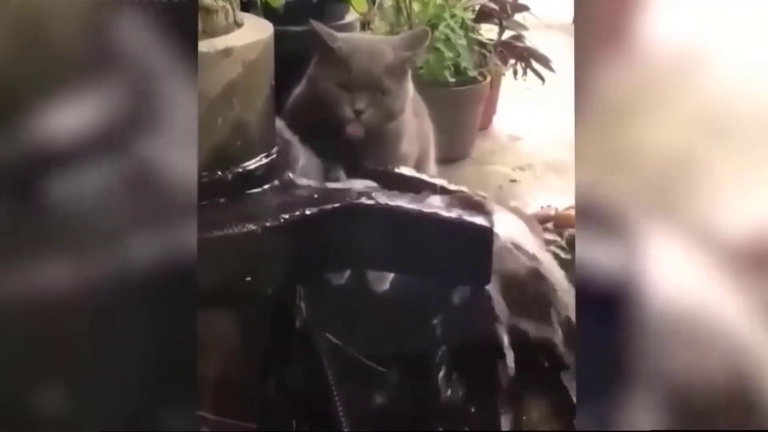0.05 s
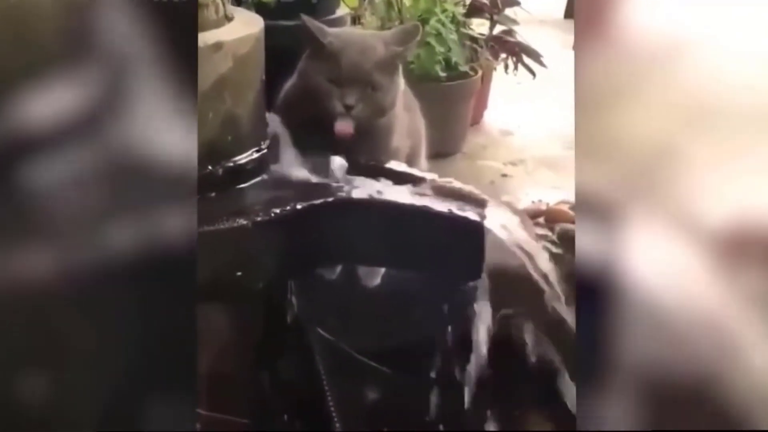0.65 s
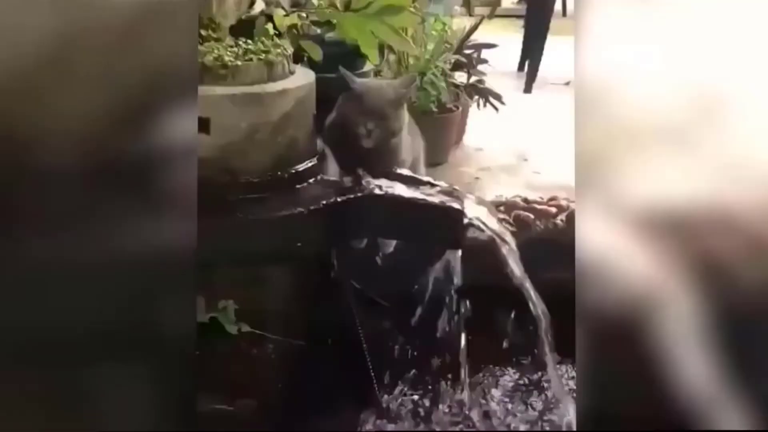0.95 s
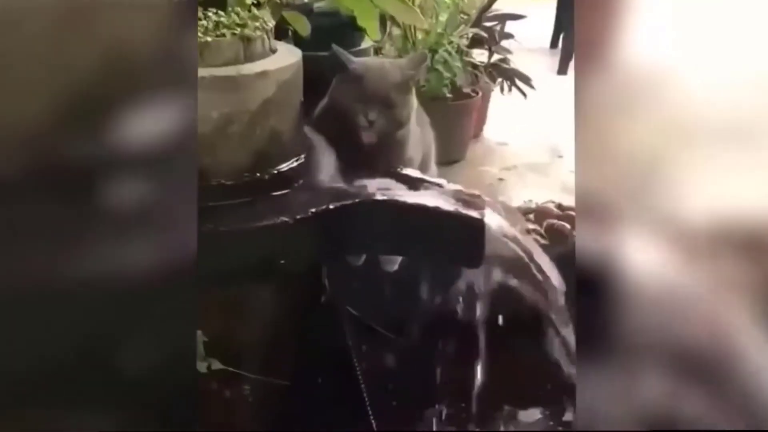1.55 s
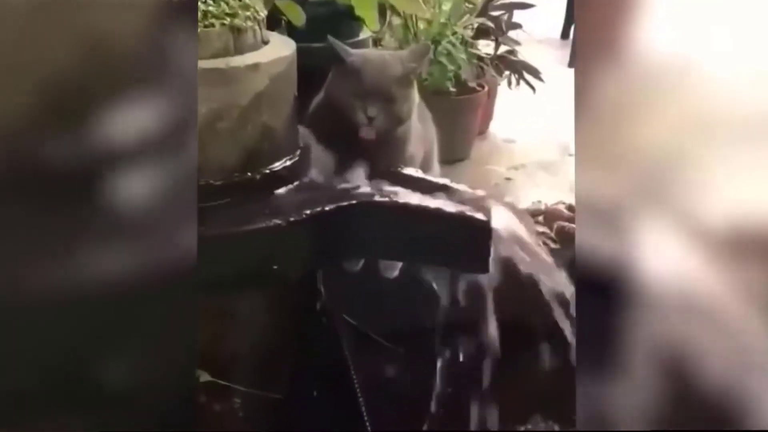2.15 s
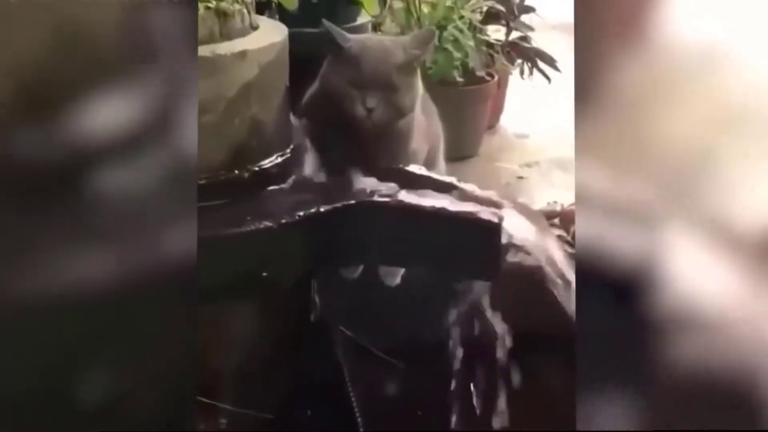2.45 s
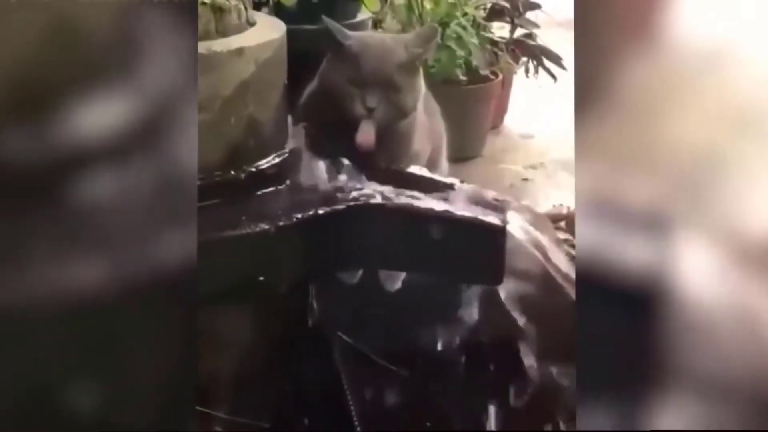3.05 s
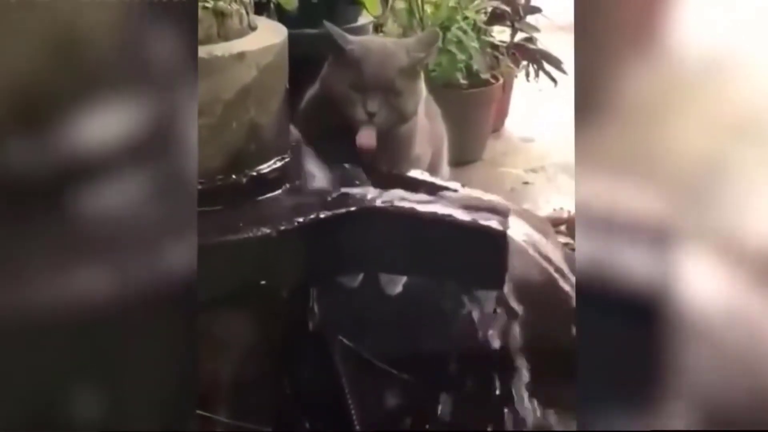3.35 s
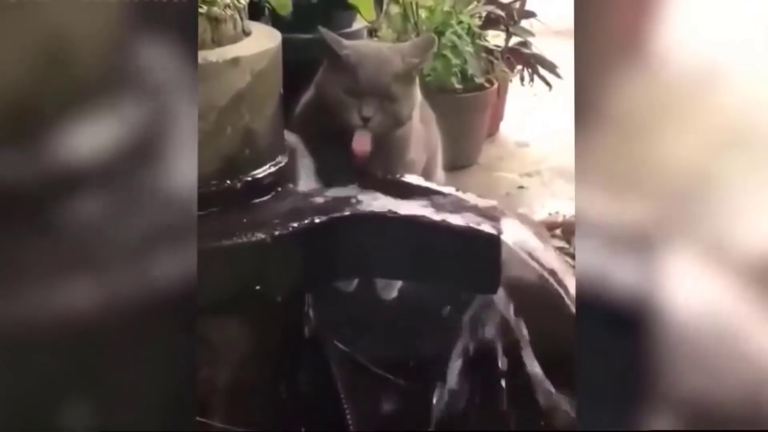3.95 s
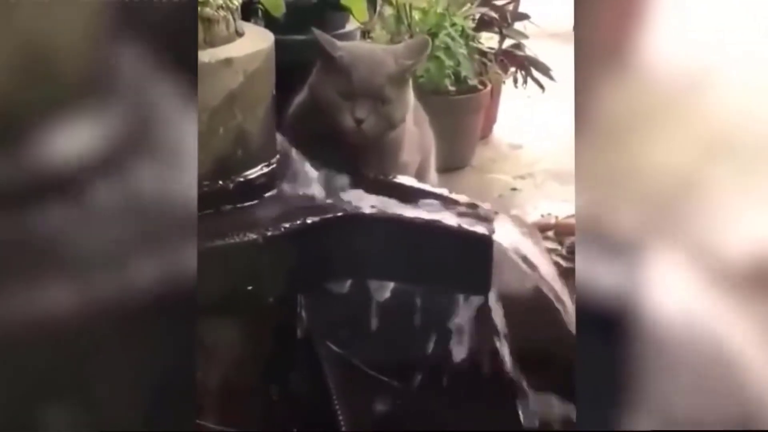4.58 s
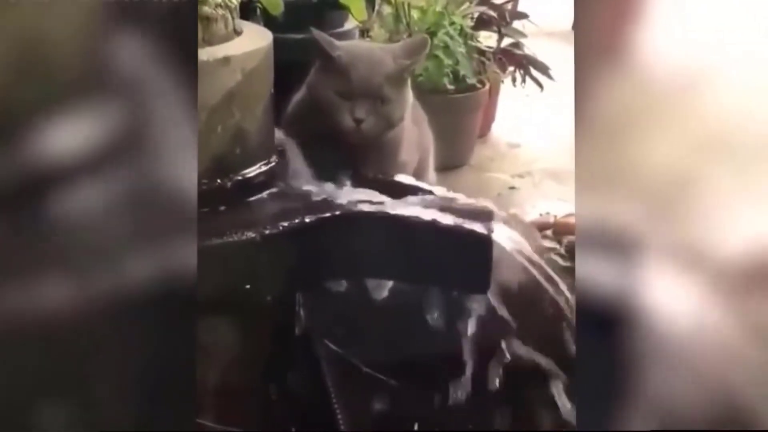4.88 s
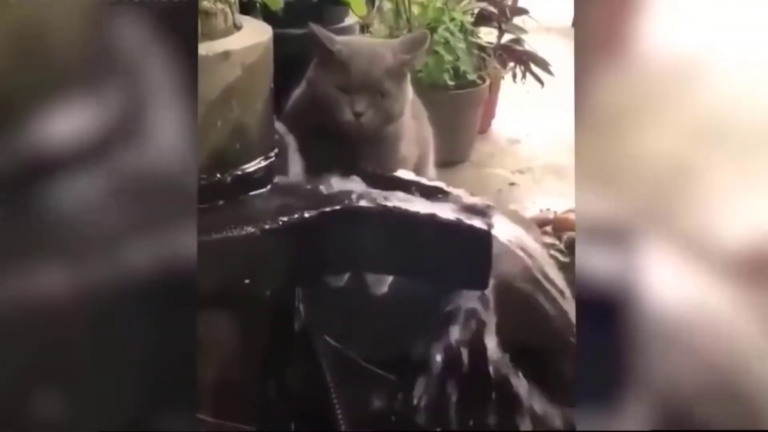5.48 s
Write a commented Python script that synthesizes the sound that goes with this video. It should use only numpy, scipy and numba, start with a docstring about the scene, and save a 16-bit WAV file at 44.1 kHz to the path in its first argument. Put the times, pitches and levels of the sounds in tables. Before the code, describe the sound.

Water pours from a small garden fountain, splashing and gurgling into its basin over a low, steady pump hum.

```python
"""Small garden fountain, close up.

Water spills over a lip and breaks up in the basin: droplets crackle, fine spray fizzes and lumps of
water slap the surface. Trapped bubbles ring and deep air pockets glug over a steady pump hum.
Just before the one-second mark the sound cuts out for a third of a second. One loud slap late on
carries a bright, clipping-like click."""
import sys
import numpy as np
from scipy import signal
from scipy.fft import rfft, irfft, next_fast_len
from scipy.io import wavfile
from scipy.ndimage import uniform_filter1d, map_coordinates
from numba import njit

SR = 44100
rng = np.random.default_rng(int(sys.argv[2]) if len(sys.argv) > 2 else 0)


def inscribe(sig):
    """Save sig as 16-bit PCM at rate SR to the path in sys.argv[1].

    A 1-D sig is mono; a 2-D sig holds one channel per row.
    Samples are clipped to [-1, 1] before scaling.
    """
    pcm = np.round(np.clip(np.atleast_2d(sig).T, -1, 1) * 32767)
    wavfile.write(sys.argv[1], SR, pcm.astype(np.int16))


N = 247842


def amp(db):
    """Decibels to gain."""
    return 10 ** (np.asarray(db) / 20)


def unit_rms(x):
    """Scale to rms 1."""
    return x / np.sqrt(np.mean(x ** 2) + 1e-20)


def unit_peak(x):
    """Scale to peak 1."""
    return x / np.abs(x).max()


def curves(rows):
    """One value per sample for each column after the time."""
    times_s, *columns = np.transpose(rows)
    return [np.interp(np.arange(N) / SR, times_s, column) for column in columns]


def wobble(rate_hz):
    """Smooth random curve, rate_hz knots a second."""
    knots = rng.standard_normal(int(N * rate_hz / SR) + 4)
    return map_coordinates(knots, [np.arange(N) * rate_hz / SR])


def swells(times_s, level_db, rise_s):
    """Envelope of stirred water: each event swells in rise_s and fades more slowly."""
    age = np.maximum(np.arange(N) / SR - times_s[:, None], 0) / rise_s
    return amp(level_db) @ (age * np.exp(1 - age))


def filtered(x, response):
    """Apply a complex response, a function of Hz."""
    size = next_fast_len(N + SR // 2)
    return irfft(rfft(x, size) * response(np.fft.rfftfreq(size, 1 / SR)), size)[..., :N]


def coloured(x, points):
    """Minimum-phase filter through (Hz, dB) points; attacks stay sharp."""
    size = 4096
    hz, db = np.transpose(points)
    gain = amp(np.interp(np.log(np.fft.rfftfreq(size, 1 / SR) + 1), np.log(hz), db))
    cepstrum = irfft(np.log(gain))
    cepstrum[1:size // 2] *= 2
    cepstrum[size // 2 + 1:] = 0
    impulse = irfft(np.exp(rfft(cepstrum)))
    return signal.fftconvolve(x, impulse)[:N]


def diffused(x, t60_s, wet_db):
    """Smear x through a drifting blend of eight short noise tails."""
    t = np.arange(SR // 6) / SR
    tails = rng.standard_normal((8, len(t))) * amp(-60 * t / t60_s) * (t > .002)
    blend = np.array([wobble(6) for _ in tails])
    sent = x * blend / np.linalg.norm(blend, axis=0)
    smeared = signal.fftconvolve(sent, tails / np.linalg.norm(tails[0]), axes=1)
    return amp(wet_db) * smeared.sum(axis=0)[:N]


@njit
def bubbles(times_s, hz, gain, t60_s, rise, samples):
    """Damped sines; each climbs in pitch by the fraction rise as the bubble nears the surface."""
    out = np.zeros(samples)
    for k in range(len(times_s)):
        start = int(times_s[k] * SR)
        for i in range(max(0, -start), min(int(t60_s[k] * SR), samples - start)):
            t = i / SR
            age = t / t60_s[k]
            attack = min(1.0, 2 * hz[k] * t)
            phase = 2 * np.pi * hz[k] * t * (1 + rise * age / 2)
            out[start + i] += gain[k] * attack * np.exp(-np.log(1000) * age) * np.sin(phase)
    return out


def shower(count, low_hz, high_hz, cycles, spread_db, rise):
    """Bubbles at random times: most faint, a few strong; big ones ring longest."""
    when, pitch, strength, life = rng.random((count, 4)).T
    hz = low_hz + (high_hz - low_hz) * pitch
    t60_s = cycles * (.5 + life) / hz
    rarity = np.minimum(-np.log(1 - strength), 4)
    gain = amp(spread_db * rarity) / np.sqrt(t60_s)
    return unit_rms(bubbles(when * N / SR, hz, gain, t60_s, rise, N))


def clumps(rate_hz, t60_s, spread_db):
    """Impact strength: water arrives in random lumps, each swelling quickly, then fading."""
    power = (rng.random(N) < rate_hz / SR) * amp(spread_db * rng.random(N)) ** 2
    fading = signal.lfilter([1], [1, -amp(-60 / (t60_s * SR)) ** 2], power)
    return unit_rms(np.sqrt(np.abs(uniform_filter1d(fading, size=160))))


# Pump hum: t/s, level/dB
HUM_LEVEL = [(0, -31), (0.8, -33.5), (1.4, -28.5), (2.3, -28.5), (3.2, -30.5), (4.3, -35), (4.8, -30.5),
             (5.6, -29.5)]
# Rumble spectrum: f/Hz, gain/dB
RUMBLE_EQ = [(15, -7.5), (35, -17.5), (62, -1), (95, -1.5), (130, -11), (220, -21), (600, -61.5)]
def pump(hum_hz=81.25):
    """The pump hums, slightly unsteady, over a steady rumble."""
    hum_db, = curves(HUM_LEVEL)
    phase = 2 * np.pi * hum_hz * np.arange(N) / SR + .3 * wobble(1.1)
    rumble = amp(-36) * unit_rms(coloured(rng.standard_normal(N), RUMBLE_EQ))
    hum = amp(hum_db - 2 + .27 * wobble(23)) * unit_rms(np.sin(phase))
    return hum + rumble


# Stereo hiss spectrum: f/Hz, gain/dB
HISS_EQ = [(1500, -61.5), (2300, -40), (3900, -40.5), (4350, 4.5), (6800, 12), (7900, 9.5)]
def stereo_hiss(pour):
    """A faint stereo hiss above 4 kHz follows the stream."""
    return coloured(diffused(pour, t60_s=.06, wet_db=-19), HISS_EQ)


def walls(water):
    """Pots and stonework scatter a brief echo that changes as the landing point wanders."""
    return diffused(water, t60_s=.08, wet_db=-7)


# Basin resonances: f/Hz, bandwidth/Hz, level/dB re direct sound
BASIN_MODES = [(1513, 110, -5), (2024, 60, -5.5), (3138, 52, -2), (4634, 140, 3)]
def basin(x):
    """The hollow under the lip resonates in a few bands."""
    def response(f):
        return 1 + sum(amp(db) * 1j * f * width_hz / (hz * hz - f * f + 1j * f * width_hz)
                       for hz, width_hz, db in BASIN_MODES)
    return filtered(x, response)


# Churning pool spectrum: f/Hz, gain/dB
CHURN_EQ = [(60, -33), (125, -11), (160, -3.5), (195, 4.5), (235, -3.5), (280, -15.5), (400, -19.5),
            (900, -33)]
def churn(flow_db):
    """Air pockets keep the pool gurgling in step with the stream."""
    pockets = shower(count=1400, low_hz=100, high_hz=500, cycles=8, spread_db=1.8, rise=.15)
    return amp(flow_db - 12 + 1.7 * wobble(14)) * unit_rms(coloured(pockets, CHURN_EQ))


# Deep air pockets: t/s, f/Hz, level/dB
DEEP_POCKETS = [(0.164, 187, -18.5), (0.769, 162, -16), (1.582, 190, -5), (1.634, 200, -16.5),
                (1.996, 215, -12), (2.711, 202, -17), (2.808, 190, -19), (3.044, 196, -11),
                (3.697, 191, -10), (3.742, 200, -15), (4.428, 196, -13.5), (4.618, 193, -14.5),
                (4.854, 217, -19)]
# Trailing pocket spectrum: f/Hz, gain/dB
TRAIL_EQ = [(80, -28.5), (150, -6), (205, 0.5), (280, -6.5), (400, -9.5), (600, -7.5), (1000, -24.5)]
def glugs(t60_cycles=13):
    """Air driven deep rings briefly and drags smaller pockets after it."""
    times_s, hz, level_db = np.array(DEEP_POCKETS, float).T.copy()
    dragged = shower(count=3000, low_hz=130, high_hz=700, cycles=12, spread_db=1, rise=.15)
    trails = swells(times_s, level_db - 18, rise_s=.018) * unit_rms(coloured(dragged, TRAIL_EQ))
    return trails + bubbles(times_s, hz, amp(level_db), t60_cycles / hz, rise=.26, samples=N)


# Clear bubbles: t/s, f/Hz, level/dB
CLEAR_BUBBLES = [(0.311, 1496, -10.5), (0.372, 1550, -17), (0.441, 1450, -14.5), (1.546, 1010, -21),
                 (1.996, 1480, -10.5), (2.098, 1084, -18.5), (2.653, 717, -16.5), (2.705, 573, -20.5),
                 (2.94, 2600, -6.5), (2.961, 717, -20.5), (3.093, 1465, -15.5), (3.226, 1076, -18.5),
                 (4.277, 523, -22), (4.324, 657, -21), (4.497, 580, -21.5), (4.98, 1580, -16.5),
                 (5.022, 1477, -13.5), (5.069, 1450, -15)]
def plinks(t60_cycles=91):
    """Single trapped bubbles ring clearly, big ones longest."""
    times_s, hz, level_db = np.array(CLEAR_BUBBLES, float).T.copy()
    return bubbles(times_s, hz, amp(level_db), t60_cycles / hz, rise=.03, samples=N)


# Click spectrum: f/Hz, gain/dB
CLICK_EQ = [(700, -18), (2200, 0), (4500, -3), (7000, -15), (8500, -32), (15000, -34)]
def click(start_s=4.3385, rise_s=.0015, level_db=-4.5):
    """A brief, bright, clipping-like click at one loud slap."""
    age_s = np.maximum(np.arange(N) / SR - start_s, 0)
    burst = rng.standard_normal(N) * age_s * np.exp(-age_s / rise_s)
    return amp(level_db) * unit_peak(coloured(burst, CLICK_EQ))


# Biggest lumps of water: t/s, level/dB, f/Hz, relative spray level/dB
BIG_LUMPS = [(0.078, -12.5, 2300, -18), (0.148, -8.5, 2960, -14), (0.312, -10, 1620, -4),
             (0.37, -17.5, 1530, 10), (0.442, -10, 1660, -5.5), (0.515, -10, 3360, -10),
             (0.59, -6.5, 2230, -16.5), (0.81, -8.5, 3420, -12), (0.892, -5.5, 3364, -18),
             (0.933, -11.5, 1900, -12), (1.323, -12, 2560, -1), (1.543, -9, 1033, -18),
             (1.561, -5.5, 1490, -13), (1.58, -9, 3100, 2), (1.646, -5, 1460, -7), (1.748, -17, 3300, 10.5),
             (1.852, -5.5, 3260, -6.5), (1.999, -10, 1660, -9), (2.304, -9, 3140, -15),
             (2.474, -12, 2800, 1), (2.706, -11.5, 1410, -0.5), (2.747, -8, 1300, -18.5),
             (2.941, -10.5, 2660, -6), (3.015, -10, 1210, -15), (3.128, -10.5, 2630, -10),
             (3.226, -12, 2430, 3.5), (3.633, -12, 1960, -20), (3.682, -5, 3560, -3.5),
             (3.824, -6.5, 3110, -13), (3.849, -12, 3870, -0.5), (4.186, -13, 3790, 2.5),
             (4.328, -13, 2100, 10), (4.339, -6.5, 2310, -8.5), (4.349, -10.5, 1650, -9.5),
             (4.428, -4.5, 2000, -6), (4.461, -6.5, 2036, -15.5), (4.595, -8, 4100, -1),
             (4.796, -7.5, 2900, -1), (5.019, -8.5, 2540, -8), (5.152, -6.5, 3224, -2.5),
             (5.217, -9, 2140, -2.5), (5.287, -11, 2280, -1.5), (5.317, -12, 4270, -8),
             (5.436, -10, 5100, 3.5)]
def slaps():
    """A lump hits the pool: one main bubble, a burst of others near its pitch, a spit of spray."""
    out = np.zeros(N + SR)
    t = np.arange(SR // 20) / SR
    attack = 1 - np.exp(-t / .0025)
    for start_s, level_db, hz, spray_db in BIG_LUMPS:
        delay, pitch, size, life = rng.standard_normal((4, 18))
        burst = bubbles(times_s=.001 + .0025 * np.abs(delay), hz=hz * np.exp(.26 * pitch),
                        gain=amp(2 * size - 2 * np.abs(delay)), t60_s=.008 * np.exp(.3 * life),
                        rise=.1, samples=len(t))
        main = np.sin(2 * np.pi * hz * t) * attack ** 2 * amp(-60 * t / .022)
        ring = unit_peak(unit_peak(burst) + .5 * unit_peak(main))
        spit = np.diff(rng.standard_normal(len(t) + 1)) * attack * amp(-60 * t / .025)
        slap = ring + amp(spray_db + 4) * unit_peak(spit)
        out[int(start_s * SR):][:len(t)] += amp(level_db - 2) * slap
    return out[:N]


# Fine spray spectrum: f/Hz, gain/dB
SPRAY_EQ = [(1500, -43), (3300, 4.5), (4300, 0), (5000, -2), (6300, 2), (7000, -1), (7800, -6.5),
            (9000, -35)]
def spray(lumps):
    """The finest droplets fizz and tinkle, partly in bursts of their own."""
    fizz = shower(count=20000, low_hz=3000, high_hz=8500, cycles=14, spread_db=2.1, rise=.1)
    tinkle = shower(count=3200, low_hz=4000, high_hz=8000, cycles=70, spread_db=3.9, rise=.04)
    bursts = .8 + .2 * lumps + clumps(rate_hz=90, t60_s=.05, spread_db=9)
    droplets = unit_rms(fizz * bursts) + .8 * tinkle
    return unit_rms(basin(coloured(droplets, SPRAY_EQ)))


# Splash spectrum: f/Hz, gain/dB
SPLASH_EQ = [(100, -46), (250, -4), (400, -5), (650, -4), (800, -6.5), (1100, -7), (1500, -3.5),
             (2200, -1.5), (2700, -5.5), (3500, -3.5), (4200, -13), (5200, -30), (8000, -36.5)]
def splash(lumps):
    """Short impacts crackle with the lumps; trapped bubbles ring longer and at any time."""
    crackle = shower(count=18000, low_hz=200, high_hz=5500, cycles=9, spread_db=2.3, rise=.1)
    ringing = shower(count=4200, low_hz=950, high_hz=4800, cycles=40, spread_db=3.8, rise=.06)
    droplets = unit_rms(crackle * (1.3 + lumps)) + 1.1 * ringing
    return unit_rms(basin(coloured(droplets, SPLASH_EQ)))


# Stream swelling and thinning: t/s, splash level/dB, spray level/dB
STREAM_FLOW = [(0.0, -21, -28), (0.4, -23, -33.5), (0.62, -24, -28.5), (0.9, -20, -32.5), (1.42, -26, -33),
               (1.6, -23, -33.5), (1.98, -23, -27.5), (2.2, -23.5, -30), (2.7, -21.5, -27.5),
               (3.0, -21, -28.5), (3.3, -21.5, -27), (3.6, -24, -32), (3.78, -20.5, -27), (4.18, -25, -30),
               (4.34, -24, -30), (4.66, -23.5, -30), (5.25, -22.5, -29), (5.6, -24, -32)]
def stream(splash_db, spray_db):
    """The falling stream breaks into splash and spray, which flutter together."""
    lumps = clumps(rate_hz=110, t60_s=.04, spread_db=10)
    coarse, fine = splash(lumps), spray(lumps)
    flutter = wobble(20)
    # Each slap throws up water that rains back.
    slap_s, slap_db, _, spit_db = np.transpose(BIG_LUMPS)
    splash_wash = swells(slap_s, slap_db - 21, rise_s=.008)
    spray_wash = swells(slap_s, slap_db + spit_db - 15, rise_s=.008)
    splash_gain = np.hypot(amp(splash_db - 1.5 + flutter), splash_wash)
    spray_gain = np.hypot(amp(spray_db + 1.5 * flutter), spray_wash)
    return splash_gain * coarse + spray_gain * fine


def scene():
    """The fountain is central; only the hiss has width."""
    splash_db, spray_db = curves(STREAM_FLOW)
    pour = stream(splash_db, spray_db)
    water = pour + slaps()
    mid = water + walls(water) + churn(splash_db) + glugs() + plinks() + pump()
    side = stereo_hiss(pour)
    return np.array([mid + side, mid - side])


# Brief cut-out, bass fading last: t/s, treble gain/dB, bass gain/dB
CUT_OUT = [(0.9635, 0, 0), (0.9636, -17, -8), (0.985, -25, -14), (0.998, -42, -15), (1.047, -46, -15),
           (1.052, -90, -70), (1.317, -100, -80), (1.3195, -20, -20), (1.3208, 0, 0)]
def record(dry, band_hz=7880, crossover_hz=300, top_hz=15300):
    """Band-limit the fountain, cut it out once, then add the wider-band click."""
    narrow = filtered(dry, lambda hz: np.clip((band_hz - hz) / 200 + .5, 0, 1))
    treble_db, bass_db = curves(CUT_OUT)
    bass = filtered(narrow, lambda hz: 1 / (1 + (hz / crossover_hz) ** 4))
    gated = amp(bass_db) * bass + amp(treble_db) * (narrow - bass)
    return filtered(gated + click(), lambda hz: np.clip((top_hz - hz) / 600 + 1, 0, 1))


dry = scene()
out = record(dry)
inscribe(out)
```